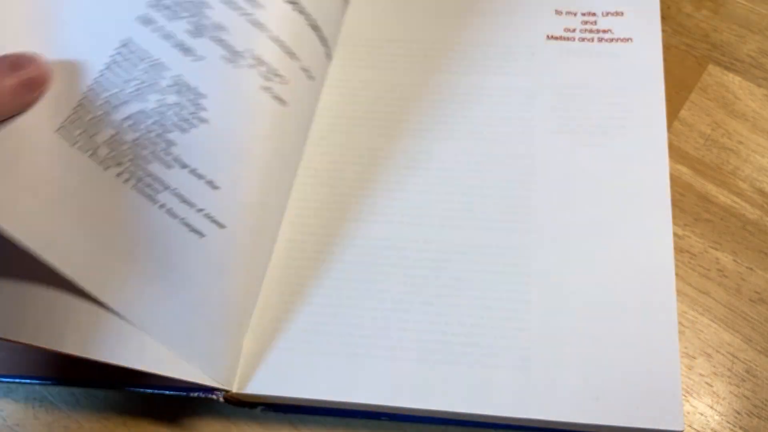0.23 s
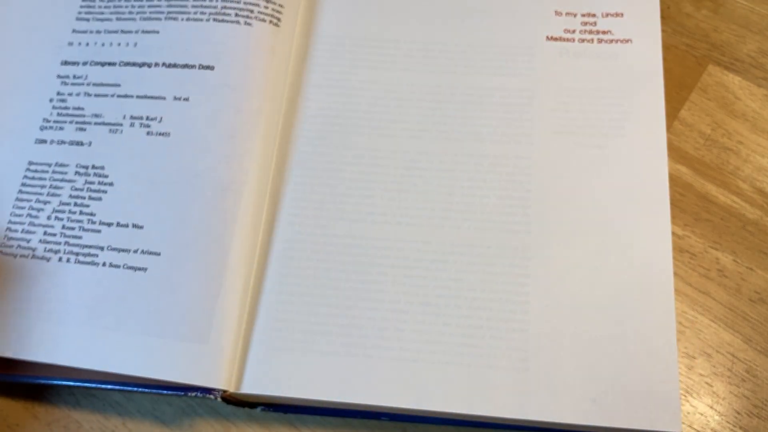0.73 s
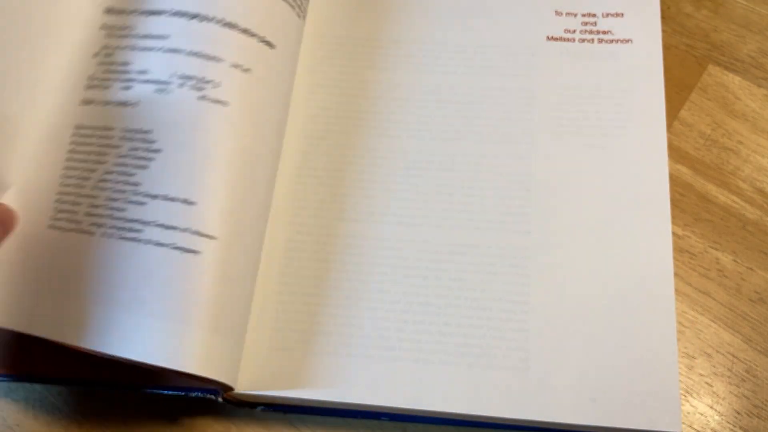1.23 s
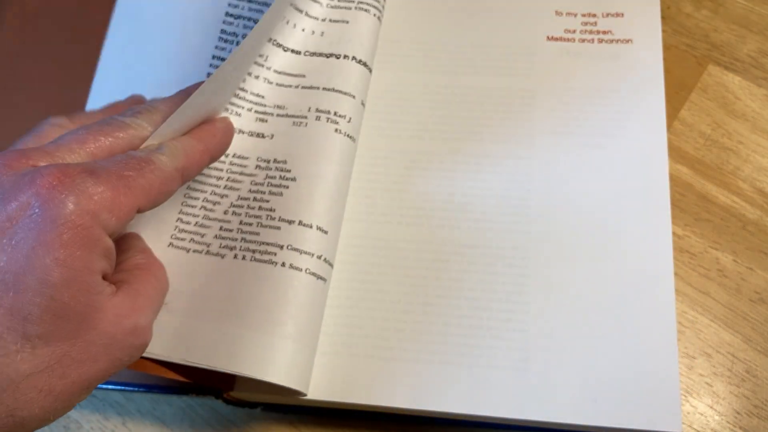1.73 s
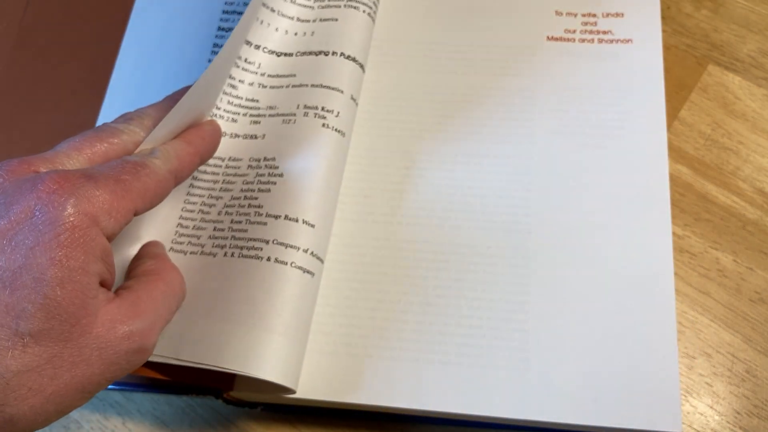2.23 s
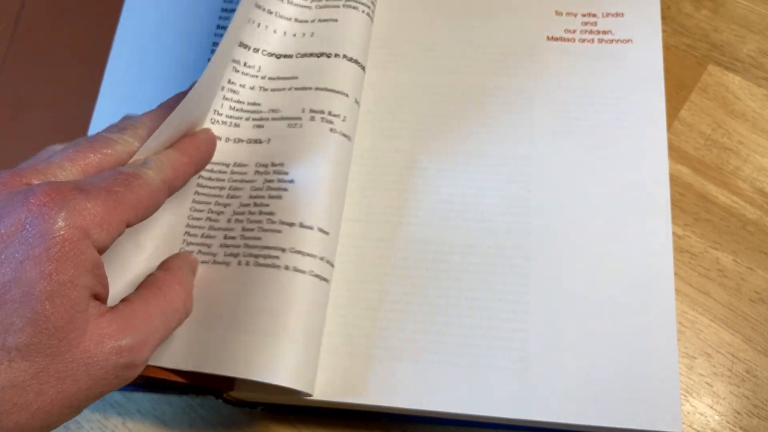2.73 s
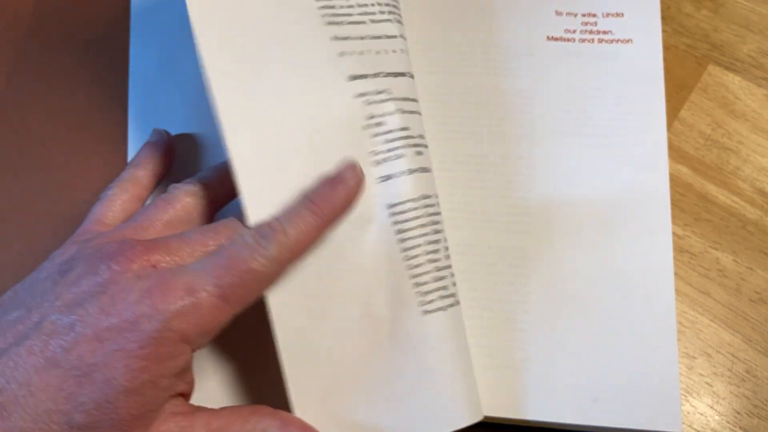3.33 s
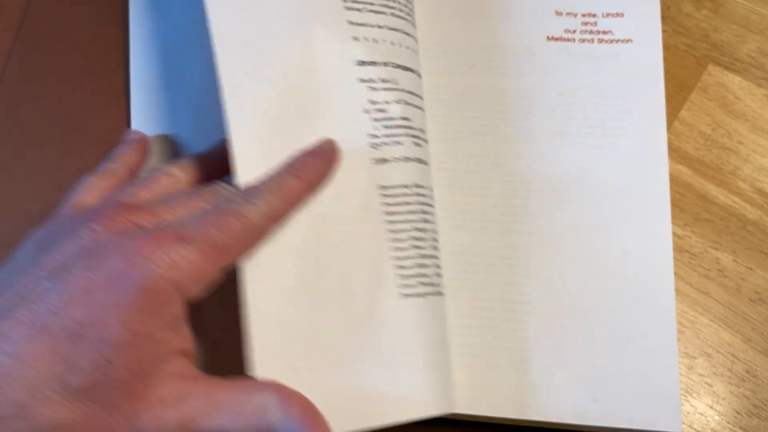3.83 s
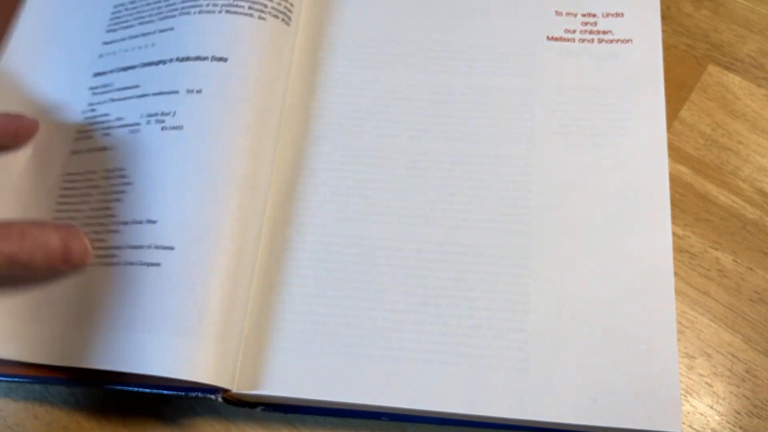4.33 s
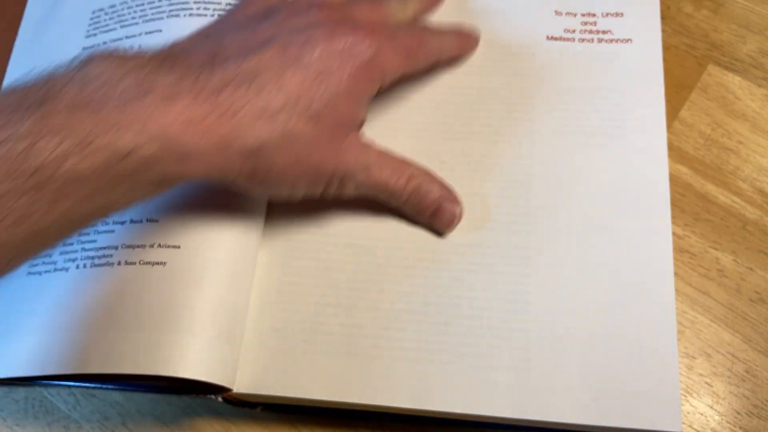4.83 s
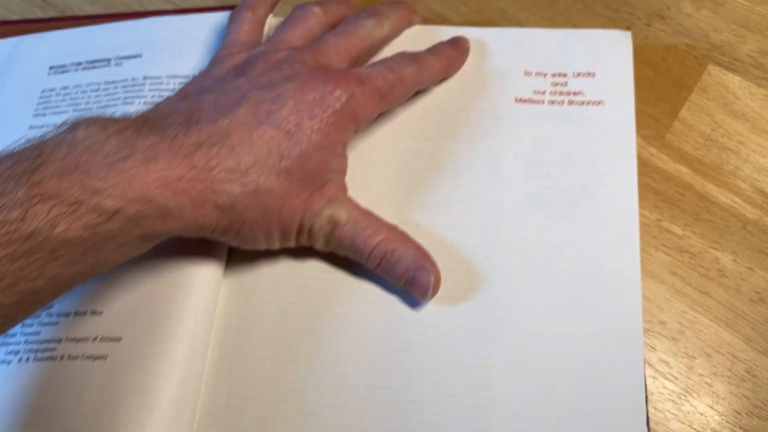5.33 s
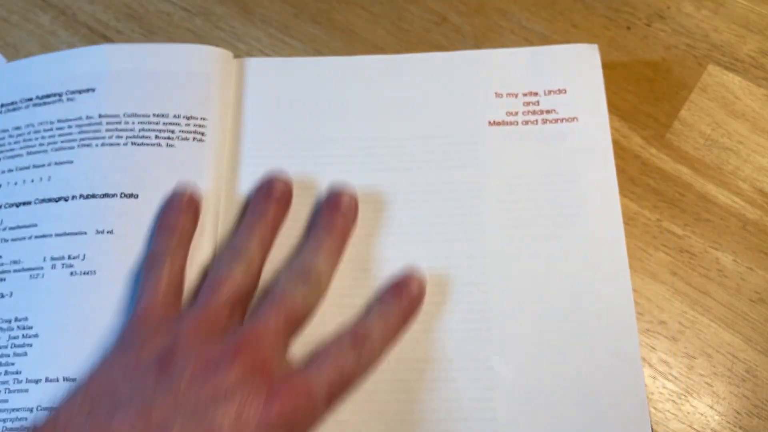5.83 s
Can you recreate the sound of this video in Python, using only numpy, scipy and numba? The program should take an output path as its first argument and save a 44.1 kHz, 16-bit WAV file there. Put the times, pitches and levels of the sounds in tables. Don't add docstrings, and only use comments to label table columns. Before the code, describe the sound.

Fingers turn and flex stiff paper with sharp crisp snaps and dry rustle, then a hand softly smooths the page over a faint room hum.

```python
import sys
import numpy as np
from scipy import signal
from scipy.fft import rfft, irfft
from scipy.io import wavfile
from scipy.ndimage import uniform_filter1d
from numba import njit

SR = 44100
rng = np.random.default_rng(int(sys.argv[2]) if len(sys.argv) > 2 else 0)


def undo_db(level):
    steps = np.asarray(level, float) / 20
    return 10 ** steps


def master_out(mix):
    frames = np.transpose(np.atleast_2d(mix))
    ceiling = np.clip(frames, -1, 1)
    pcm = np.round(ceiling * 32767).astype(np.int16)
    wavfile.write(sys.argv[1], SR, pcm)


N = 267863

# start in seconds, strength in dB, sharpness in dB, fizz in dB.
SNAPS = [(0.1063, -31.5, 4, -24.5), (0.12, -33.5, 9.5, -18), (0.143, -33, 4, -15),
         (.7067, -47.5, 6.5, -5.5), (1.3256, -26.5, 11, 3.5), (1.5033, -34, 18, 0), (1.687, -40, -1, -22),
         (1.7475, -41.5, -4, -16), (2.318, -20.5, 11.5, 1.5), (2.9285, -32, 15, 4.5),
         (3.029, -44, 21.5, 19), (3.074, -55, 20, 15), (3.1656, -26.5, 5, -10.5), (3.31, -28, 6.5, -13.5),
         (3.3247, -35.5, 9, -10), (3.5588, -37, 5, -28), (3.567, -34, -18, -29), (3.5766, -42, 14.5, -0.5),
         (3.743, -32.5, 4, -15), (3.8875, -35.5, 4.5, -6), (3.9318, -37.5, -2, -12.5),
         (4.0548, -27.5, 10, -3.5), (4.3398, -35.5, 5, -9.5), (4.5997, -28.5, 0.5, -15.5)]
# start in seconds, strength in dB, sharpness in dB,
# fade to -60 dB in ms.
SPLITS = [(.978, -55, -7, 29), (1.0922, -34, 11, 37), (2.333, -37.5, 4.5, 120), (2.371, -56, -1, 100),
          (3.0289, -20.5, -10, 5), (3.05, -67, 3, 10), (3.0642, -24, -12, 17), (3.087, -40, -2, 132),
          (3.706, -69, 0, 26), (3.897, -42.5, 12.5, 30), (4.091, -47, 16, 29), (4.1104, -26.5, 5, 19),
          (4.114, -37.5, 34, 8), (4.1173, -30.5, 8, 61), (5.005, -44, -10, 18)]
# start in seconds, strength in dB, sharpness in dB.
TICKS = [(.001, -36, -37), (0.053, -44.5, -23), (0.182, -47, 6), (.221, -44, 4.5), (0.439, -55, -1),
         (.6424, -56, 5), (1.269, -44.5, -7), (1.481, -49, -11), (1.539, -53, -24), (2.261, -50.5, -16),
         (2.82, -51, -7), (2.877, -42.5, -20), (3.469, -47, -6), (4.4912, -55, 1), (4.7104, -58, -3)]
# start in seconds, level in dB.
KNOCKS = [(.001, -39.5), (.1061, -46), (.1213, -49), (.978, -57), (1.538, -42.5), (2.262, -50),
          (2.8797, -39), (3.0644, -36), (3.087, -36.5), (3.3247, -39.5), (3.3905, -42.5), (3.898, -50.5),
          (4.712, -45), (5.005, -51.5)]

# start in seconds, high note peak
# in dB, low note in Hz, low note peak in dB, high note in Hz.
FLIPS = [(.1053, -32, 580, -35, 4550), (.1204, -15.5, 560, -36, 2880), (.143, -29, 870, -39, 2900),
         (.1806, -43, 890, -36, 3600), (1.093, -19, 1310, -26, 4030), (1.3249, -19, 1580, -32, 3900),
         (1.5041, -13, 1040, -45, 4000), (1.6872, -47, 1440, -39.5, 4330), (1.7493, -41, 1040, -40.5, 3600),
         (2.319, -11.5, 1240, -23.5, 3830), (2.9287, -25, 1380, -40, 4140), (3.03, -17, 1500, -27.5, 3820),
         (3.0656, -23, 456, -28, 1250), (3.1667, -15, 1070, -36, 4510), (3.5607, -32, 860, -37.5, 4600),
         (3.568, -30, 1070, -32, 4400), (3.7437, -27.5, 1040, -33, 3580), (3.8886, -44, 1030, -33, 3350),
         (4.0562, -23, 1180, -32, 3600), (4.1121, -7.5, 1300, -25, 3880), (4.6001, -29.5, 530, -42, 3400),
         (5.007, -44, 1400, -48, 2570),
         (.002, -55, 1050, -34, 780), (0.443, -46, 1300, -51, 2700), (.978, -62, 550, -49, 1200),
               (2.263, -55, 660, -46.5, 1300), (3.024, -30, 4300, -48, 7240),
               (4.7105, -50, 1500, -64, 6000), (5.158, -44, 1100, -62, 2600)]
THUDS = [
    (0.106, -57, 130, -58, 332),
    (2.322, -31, 1150, -40, 2430),
    (3.066, -34, 110, -37.5, 257),
    (3.389, -53, 139, -65, 400),
    (3.743, -30, 270, -52, 424),
    (4.121, -42, 251, -49.5, 487),
    (4.711, -51, 110, -53.5, 240),
]

# start in seconds, level in dB, brightness in dB, length in ms.
SCUFFS = [(.07, -52, -1, 146), (.09, -58, 2, 170), (.2, -63, -12, 120), (.62, -68, -2, 52),
          (.665, -61.5, -3, 35), (.715, -62, -3, 41), (.789, -61.5, 3.5, 58), (.861, -60.5, 3.5, 71),
          (.905, -58.5, 8, 62), (1.24, -56.5, -2, 58), (1.56, -69, -18, 190), (1.7, -60, -3, 75),
          (2.56, -79, -20.5, 480), (2.88, -70, 17, 123), (3.04, -58, 2, 146), (3.22, -65, -37, 89),
          (3.28, -58, -22, 44), (3.418, -65, -28, 11), (3.47, -64, -12, 51), (3.63, -69, 6, 45),
          (4.219, -52.5, 1, 68), (4.292, -43, 1, 43), (4.316, -49, 2, 27), (4.405, -46, -4, 30.4),
          (4.56, -57.5, -4, 55), (4.84, -54, -12, 131), (5.78, -75, 13, 260), (5.87, -68.5, 1.5, 117)]
# time in seconds, pressure in dB, speed as brightness in dB.
SLIDE = [(0, -53.5, 0.5), (.3, -63.5, -1.5), (.68, -80, -3), (.98, -68, 0.5), (1.13, -56.5, 0.5),
         (1.62, -57.5, -2), (1.88, -71, 5.5), (2.1, -79.5, 5.5), (2.46, -80.5, 0), (2.83, -58, 0),
         (3.17, -54, -1.7), (3.56, -68.5, -2.5), (4.09, -53, -2), (4.36, -67, 0), (4.6, -59.5, -2),
         (5.02, -67.5, 2.5), (5.49, -66, -1.5), (6.07, -68.5, -2)]
# start in seconds, level in dB, length in ms.
SWEEPS = [
    (1.08, -86, 330),
    (4.56, -65, 390),
    (5.08, -71, 290),
    (5.33, -71.5, 220),
    (5.5, -62.5, 436),
    (5.66, -71, 180),
]
# book, sheet, edge, treble and air, all in dB.
PALM_SHARES = [-21.5, -17.5, -2, -6, 0.5]
# start in seconds, level in dB, length in ms.
DRAGS = [
    (1.62, -69, 470),
    (4.7, -77, 120),
    (4.93, -64.5, 410),
    (5.3, -68, 440),
]
# start in seconds, pitch in Hz, width in Hz, level in dB, length in ms.
SQUEAK = (5.88, 710, 54, -61, 129)
# start in seconds, centre in Hz, width in Hz,
# level in dB, length in ms.
CUPPED = [
    (5.4, 2750, 1000, -65, 390),
    (5.87, 3900, 550, -61, 126),
]

# centre in Hz, width in Hz, level in dB.
BOOK = [(110, 180, -7), (196, 111, -1.5), (400, 346, 0.5)]
SHEET = [(538.5, 105, -5.5), (718, 114, -8.5), (881, 107, -5), (1040, 120, -3), (1216, 260, -1.5),
         (1500, 380, -1.5), (1770, 554, -1.5), (2473, 680, -1), (2690, 664, -1.5)]
EDGE = [(3350, 970, -1.5), (4020, 504, -0.5), (4340, 530, -2), (5180, 1280, -5)]
TREBLE = [(6105, 1200, -0.6), (7096, 1000, -4), (8160, 1900, -3)]
AIR = [(9280, 6600, 2), (12500, 5000, -7.5), (14350, 2700, -7)]

# frequency in Hz, level in dB per Hz.
HUM = [(12, -47), (20, -15), (32, -20), (92, -4.5), (219, -3.5), (298, -19.5), (439, -9), (958, -34),
       (1040, -43), (2470, -23), (15500, -27.5)]


def pages():
    events = crack_events()
    slips = grains(0.96, hold=16)
    palm = swells(SWEEPS)
    bodies = [(BOOK, .05, 1), (SHEET, .04, -1), (EDGE, .015, 1), (TREBLE, .02, 1), (AIR, .015, -1)]
    out = flips() + squeak() + cupped() + crisp(events, slips, palm)
    for (modes, bend, sign), snap, rub in zip(bodies, buckles(events), rubbing(palm)):
        push = snap * slips + rub * grains(1.6, hold=9)
        out = out + undo_db(-4.0) * ring(push, modes, bend, sign=sign)
    return out


def crack_events():
    rows = [(*row, 54.5) for row in SNAPS]
    for s, strength, sharp, fade_ms in [(*row, 84) for row in TICKS] + SPLITS:
        rows.append((s, strength, sharp, -10 + 0.36 * sharp, fade_ms))
    return np.transpose(rows)


def buckles(events):
    start, strength, sharp, fizz, fade_ms = events
    bodies = [(strength - 21, 1.6, .001, -6, -18),
              (strength, 1.5, .0005, -4, -16),
              (strength + sharp, .9, .0003, -10, -24),
              (strength + fizz, .8, .0002, -3, -22),
              (strength + fizz, .7, .0002, -13, -22)]
    pushes = []
    for db, stretch, rise, trim_db, shiver_db in bodies:
        shapes = [crack(ms * stretch, rise, shiver_db) for ms in fade_ms]
        pushes.append(bursts(start, db + trim_db, shapes))
    bump = crack(57 * 1.6, 0.0023, -19)
    pushes[0] += undo_db(-6) * bursts(*np.transpose(KNOCKS), [bump] * len(KNOCKS))
    return pushes


def crack(t60_ms, rise, tail_db):
    t = np.arange(SR // 2) / SR
    fade = np.log(1000) * t * 1000 / np.clip(t60_ms, 5, 400)
    return (1 - np.exp(-t / rise)) * (np.exp(-fade) + undo_db(tail_db) * np.exp(-fade / 3.57))


def crisp(events, slips, palm):
    start, strength, _, fizz, fade_ms = events
    db = strength + 0.8 * np.minimum(fizz, 3) - 15.5
    rattle = bursts(start, db, [crack(ms * 0.87, .0004, -16) for ms in fade_ms])
    push = rattle * slips + undo_db(-4.5) * palm * rng.standard_normal(N)
    return ring(push, SHEET[-3:], 0.056, sign=-1)


def flips():
    out, t = np.zeros(N + SR), np.arange(SR // 10) / SR
    rows = [(*row, 5.84) for row in FLIPS] + [(*row, 25.3) for row in THUDS]
    for s, high_db, low_hz, low_db, high_hz, ring_ms in rows:
        fade = np.log(1000) * t * 1000 / np.clip(ring_ms, 3, 60)
        note = undo_db(high_db + 2.5) * np.sin(2 * np.pi * high_hz * t) * np.exp(-fade)
        note += undo_db(low_db + 6.5) * np.sin(2 * np.pi * low_hz * t) * np.exp(-fade / 2.07)
        i = int(s * SR)
        out[i:i + len(t)] -= note * (1 - np.exp(-t * high_hz / 0.95))
    return signal.sosfilt(signal.butter(3, 110, "high", fs=SR, output="sos"), out[:N])


def rubbing(palm):
    start, scuff, bright, length_ms = np.transpose(SCUFFS)
    t = np.arange(N) / SR
    s, press, speed = np.transpose(SLIDE)
    press, speed = np.interp(t, s, press), np.interp(t, s, speed)
    sheet_scuff = scuff - 4.5 - 0.042 * bright
    sheet_rub = 0.6 * press - 0.31 * speed - 22.5
    bodies = [(sheet_scuff - 18, 0.41 * sheet_rub - 44),
              (sheet_scuff, sheet_rub),
              (scuff, press),
              (scuff + bright - 7, press + speed - 3.5),
              (scuff + bright - 14, press + 1.23 * speed - 7.5)]
    shake = walk(rate=25)
    lift = np.clip((5.99 - t) / 0.015 + .5, .35, 1)
    pushes = []
    for (scuff_db, rub_db), palm_db in zip(bodies, PALM_SHARES):
        rub = bursts(start, scuff_db, map(hump, length_ms))
        rub += undo_db(rub_db + 0.87 * shake + 0.87 * walk(rate=48))
        pushes.append(rub + undo_db(palm_db) * palm)
    pushes[0] += swells(DRAGS)
    return [push * lift for push in pushes]


def squeak():
    at, hz, width, db, ms = SQUEAK
    judder = bursts([at, at + 0.068], [db, db], [hump(ms * .45)] * 2)
    return ring(judder * grains(4.9, hold=9), [(hz, width, 0)], 0.012)


def cupped():
    out = 0
    for at, hz, width, db, ms in CUPPED:
        swell = bursts([at], [db], [hump(ms)])
        out = out + ring(swell * grains(1.5, hold=9), [(hz, width, 0)], .01)
    return out


def swells(rows):
    start, db, length_ms = np.transpose(rows)
    return bursts(start, db, map(hump, length_ms))


def hump(ms):
    return np.hanning(int(np.clip(ms, 8, 450) * SR / 1000)) ** 0.47


def bursts(times, dbs, shapes):
    env = np.zeros(N + SR)
    for s, db, shape in zip(times, dbs, shapes):
        i = int(s * SR)
        env[i:i + len(shape)] += undo_db(db) * shape
    return env[:N]


def grains(spread_db, hold):
    size = np.repeat(undo_db(spread_db * rng.exponential(size=N // hold + 1)), hold)[:N]
    return level(size * rng.standard_normal(N))


def ring(push, modes, bend, sign=1):
    out = 0
    for k, (hz, width, db) in enumerate(modes):
        centre = hz * np.exp(bend * walk(rate=12))
        drift_db = 2.26 * min(1200 / hz, 1) * walk(rate=8.9)
        gain = np.sqrt(SR / width) * undo_db(db + drift_db)
        once = svf(push + 1e-18, centre, 1.36 * width)
        twice = svf(once, centre, 1.36 * width)
        out = out + sign * (-1) ** k * gain * twice
    return out / np.sqrt(np.sum(undo_db(2 * np.array(modes)[:, 2])))


@njit
def svf(x, hz, width):
    y, b, l = np.empty(len(x)), 0., 0.
    for i in range(len(x)):
        g, k = np.tan(np.pi * hz[i] / SR), width / hz[i]
        v = (b + g * (x[i] - l)) / (1 + g * (g + k))
        b, l, y[i] = 2 * v - b, l + 2 * g * v, k * v
    return y


def walk(rate):
    k = int(SR / rate)
    steps = np.repeat(rng.standard_normal(N // k + 1), k)
    return level(uniform_filter1d(uniform_filter1d(steps, k), k)[:N])


def level(x):
    return x / np.sqrt(np.mean(x ** 2))


def room(paper):
    lags = rng.integers(250, 1900, size=8)
    return walls(paper, lags, undo_db(-60 * lags / SR / 0.21), 0.42)


@njit
def walls(x, lags, gain, damp):
    line, soft, out = np.zeros((8, 4096)), np.zeros(8), np.zeros(len(x))
    for i in range(len(x)):
        for k in range(8):
            soft[k] += (1 - damp) * (gain[k] * line[k, (i - lags[k]) & 4095] - soft[k])
        total = soft.sum()
        out[i] = total
        for k in range(8):
            line[k, i & 4095] = x[i] + soft[k] - total / 4
    return out


def hum():
    hz, db = np.transpose(HUM)
    f = np.maximum(np.fft.rfftfreq(N, 1 / SR), 1)
    colour = undo_db(np.interp(np.log(f), np.log(hz), db))
    return undo_db(-63 - 7.0) * level(irfft(rfft(rng.standard_normal(N)) * colour, N))


def scene():
    paper = pages()
    return (paper + undo_db(-22) * room(paper) + hum())[None]


def low_pass(x):
    return signal.sosfilt(signal.butter(12, 16470, fs=SR, output="sos"), x)


def record(dry):
    top_cut = signal.ellip(8, .2, 60, 15950, fs=SR, output="sos")
    return low_pass(signal.sosfilt(top_cut, dry))


dry = scene()
out = record(dry)
master_out(out)
```